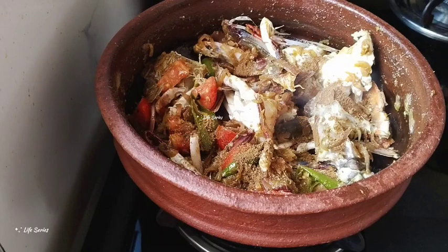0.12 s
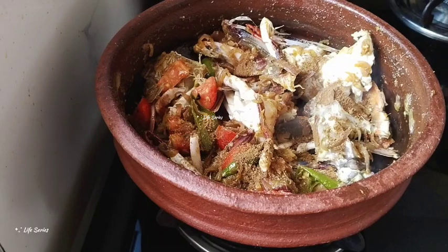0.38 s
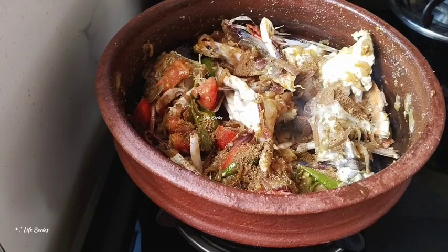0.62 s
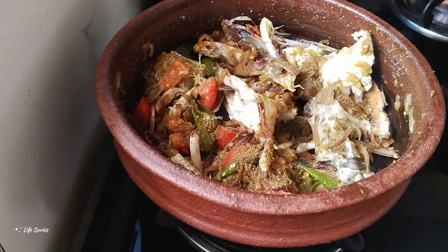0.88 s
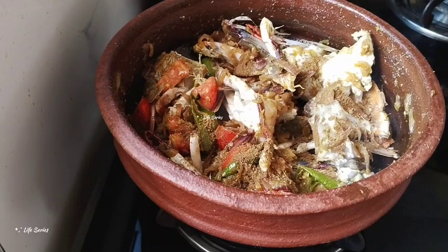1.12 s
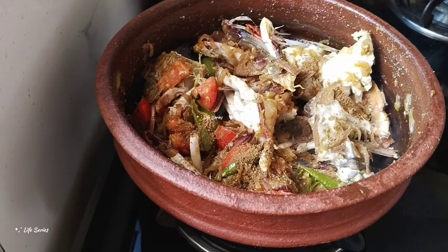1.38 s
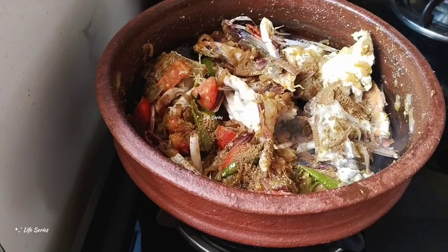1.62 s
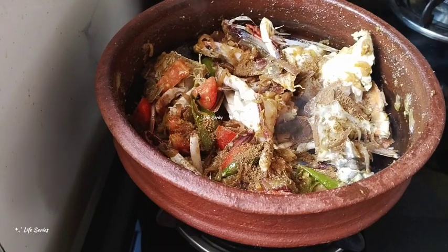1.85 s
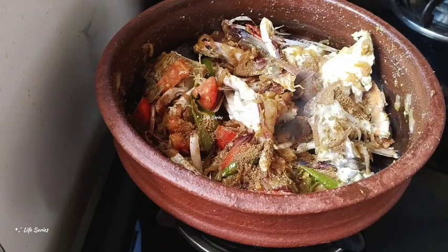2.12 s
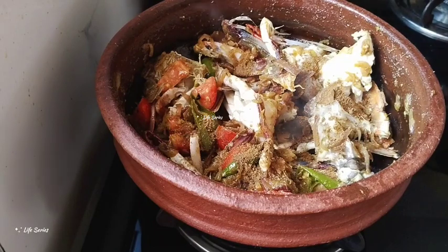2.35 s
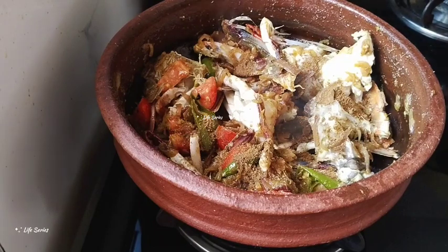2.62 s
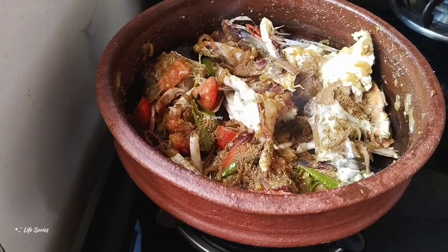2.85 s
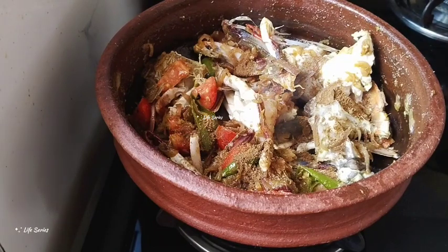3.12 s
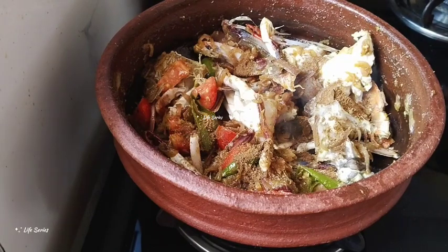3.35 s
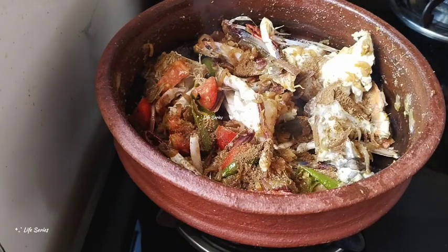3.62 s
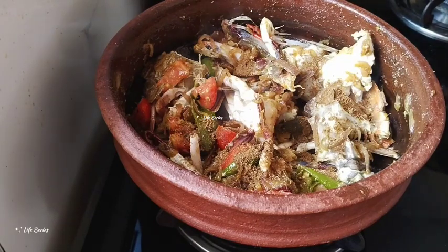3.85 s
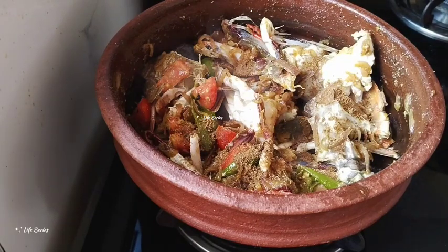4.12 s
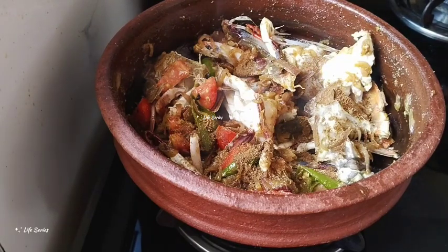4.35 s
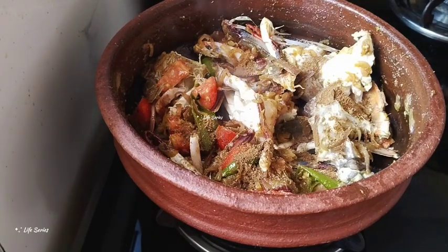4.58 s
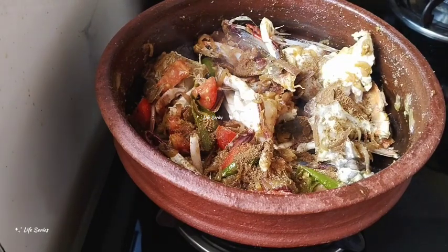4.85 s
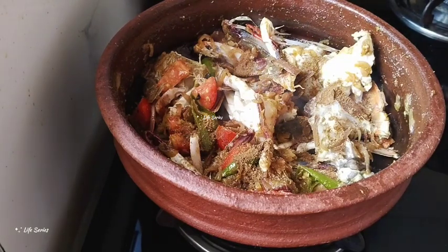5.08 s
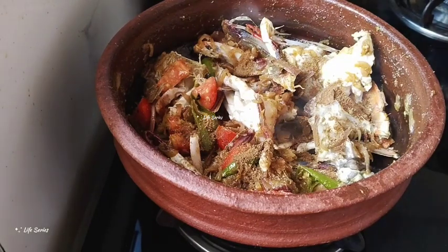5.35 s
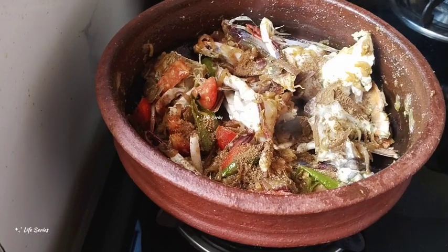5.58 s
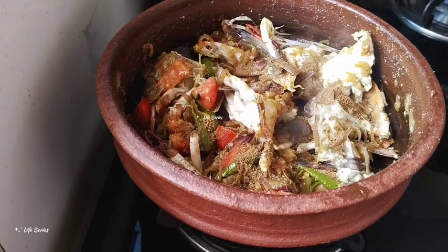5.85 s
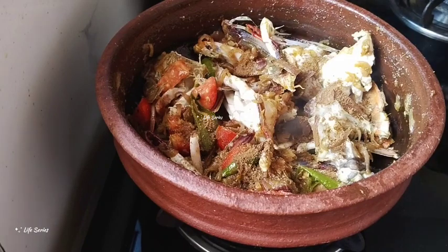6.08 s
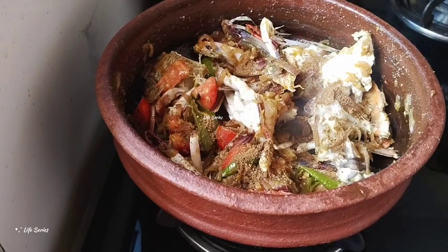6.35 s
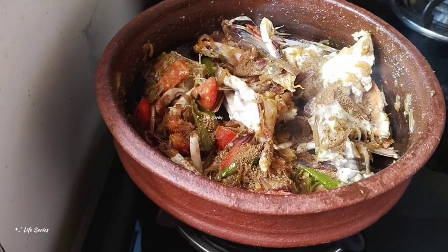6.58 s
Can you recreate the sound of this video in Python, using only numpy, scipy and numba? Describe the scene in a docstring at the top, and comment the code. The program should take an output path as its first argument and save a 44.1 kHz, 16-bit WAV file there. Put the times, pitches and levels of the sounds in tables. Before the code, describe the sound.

A soft, steady sizzle of wet food in a clay pot fills the whole 6.7 seconds, close and wide, its fine fizz flickering and lightly coloured by the pot. Tiny damped crackles are scattered throughout on both sides. Underneath lies a faint low rumble of burner and kitchen, with a brief low hum until 0.6 s. A dull, hollow rustle with soft bumps comes at 0.5-1.1 s. A hissier one starts at 1.6 s and swells near 2.0 s, where the sharpest pops cluster, the loudest at 2.07 s. A weaker rub follows at 2.3-2.65 s, then a longer, brighter rustle until 3.35 s, with clear snaps around 2.9 and 3.05 s. Afterwards it is calmer: even fizz, a snap at 3.9 s, a small soft blip near 4.9 s, and several light high ticks from 5.75 s to the end. Room reflections are short; the sizzle continues without a finish.

```python
"""In a kitchen, onion, tomato and crab sizzle softly in a clay pot, close to two microphone ports.
Thousands of short rings at random pitches form the fizz of steam bubbles, coloured by pot resonances.
Single bubbles burst as short damped crackles; short soft tones of slightly rising pitch, mostly low,
sound now and then; four rustles nearby are noise and grains through moving resonances. Burner and kitchen
give a low rumble of filtered noise and a brief hum; all but fizz and rumble get a tail of reflections."""
import sys
import numpy as np
from scipy import signal
from scipy.fft import rfft, irfft
from scipy.io import wavfile
from scipy.ndimage import uniform_filter1d
from numba import njit

SR = 44100
rng = np.random.default_rng(int(sys.argv[2]) if len(sys.argv) > 2 else 0)


def magnitude_from_level(level_db):
    """Linear magnitude for a level in decibels (20 dB per decade)."""
    exponent = np.asarray(level_db, float) / 20
    return 10 ** exponent


def waveform_to_disk(signal):
    """Save audio, clipped to [-1, 1], as 16-bit WAV at the path in sys.argv[1]."""
    frames = np.transpose(np.atleast_2d(signal))
    scaled = np.clip(frames, -1, 1) * 32767
    samples = np.round(scaled).astype(np.int16)
    wavfile.write(sys.argv[1], SR, samples)


N = 296043
HZ = np.maximum(np.arange(N // 2 + 1) * SR / N, 1)  # frequency bins
S = np.arange(N) / SR  # sample times in s

# heat in the oil, before random flicker: t/s, fizz level from 1.5 to 5.5 kHz/dB,
# treble lift/dB (starts at 4.2 kHz, full from 8.4 kHz)
OIL_HEAT = [(0.0, -59.5, 0.5), (0.5, -57.5, 4.5), (0.57, -60, 0), (0.61, -54, 2.5), (1.15, -60, 0.5),
            (1.19, -55.5, 2), (1.42, -60.5, 6), (1.66, -57, 3.5), (2.4, -56.5, 4), (3.3, -61, -4),
            (3.7, -57.5, 4), (4.0, -57.5, 1.5), (4.4, -59.5, 3), (4.78, -58.5, 0.5), (5.05, -58, 3.5),
            (5.22, -59.5, 0), (5.6, -57, 2.5), (5.8, -59.5, 2.5), (6.0, -59, 3), (6.26, -57.5, 1.5),
            (6.3, -60.5, 6.5), (6.4, -57.5, 1.5), (6.5, -57, 3.5), (6.58, -55, 0), (6.71, -57, 3)]
# loudest bursting bubbles: t/s, nominal peak level/dB, nominal pitch f/Hz, left minus right level/dB
LOUD_BURSTS = [(0.2425, -34, 3360, 0.5), (0.4988, -41, 1500, 4), (0.5978, -37.5, 1500, 0),
               (0.599, -33.5, 3070, -3), (0.864, -27.5, 4850, -1), (1.1653, -30, 12800, 4),
               (1.3761, -36.5, 3100, -3), (1.634, -29, 7240, -1), (1.8597, -34, 6700, 5),
               (1.953, -26, 8600, 0), (1.9595, -25.5, 3380, -1), (1.994, -26, 5080, 6),
               (2.0687, -16.5, 4570, 4.5), (2.0732, -19, 8000, -3), (2.2021, -31, 4400, -4),
               (2.291, -32.5, 7040, 3), (2.851, -30, 5000, 0), (2.9014, -23.5, 2470, 4),
               (3.05, -26.5, 2540, 2), (3.693, -35, 3470, 2), (3.855, -37.5, 2470, -3),
               (3.928, -25, 5130, -0.5), (4.799, -39, 11000, 3), (4.9308, -33.5, 3000, 0),
               (4.974, -35.5, 2220, 0.0), (5.759, -36, 7700, 11), (5.8495, -32.5, 8100, 8),
               (5.96, -42, 3020, -3), (5.983, -33.5, 8000, -4), (6.1425, -37, 5500, -2),
               (6.283, -29.5, 7400, -5), (6.285, -29, 6750, -1), (6.567, -31, 10100, 0),
               (6.66, -31, 10100, -4)]
# correlation of the ports in diffuse noise: f/Hz, share common to both [1]
PORT_LIKENESS = [(60, 0.97), (130, 1), (290, 0.86), (640, 0.65), (1410, 0.41), (3100, 0.2), (6820, 0.066),
                 (15000, 0.085)]


def over_hz(table):
    """Spectral envelope: a (f/Hz, value) table interpolated over log frequency at every bin."""
    f, v = np.transpose(table)
    return np.interp(np.log(HZ), np.log(f), v)


def over_time(rows):
    """Temporal envelope: each column of (t/s, ..) rows interpolated linearly at every sample."""
    s, *columns = np.transpose(rows)
    return [np.interp(S, s, c) for c in columns]


def below(hz, order=4):
    """Butterworth magnitude response of a low-pass."""
    return 1 / np.sqrt(1 + (HZ / hz) ** (2 * order))


def above(hz, order=4):
    """Butterworth magnitude response of a high-pass."""
    return 1 / np.sqrt(1 + (hz / HZ) ** (2 * order))


def peaks_db(modes):
    """Modal resonance: sum of Lorentzian humps in dB from (f/Hz, width/Hz, level/dB) rows."""
    return sum(db / (1 + (2 * (HZ - f) / width) ** 2) for f, width, db in modes)


def shape(x, gain):
    """Linear filtering by a gain per bin; the rms of the mean of the channels becomes 1."""
    y = irfft(rfft(x) * gain, N)
    return y / np.std(y.mean(axis=0))


def pair(two, likeness):
    """Spatial coherence: left and right as sum and difference of a common and an opposed part."""
    c = np.clip(over_hz(likeness), -.99, .99)
    mid, side = rfft(two) * np.sqrt([1 + c, 1 - c])
    return irfft([mid + side, mid - side], N)


def walk(rate):
    """Slow random modulation: levels held 1 / rate s, smoothed by two moving averages; spread 1."""
    k = int(SR / rate)
    held = np.repeat(rng.standard_normal(N // k + 1), k)
    w = uniform_filter1d(uniform_filter1d(held, k), k)[:N]
    return w / np.std(w)


@njit
def ring(start, hz, fade, size, rise):
    """Damped oscillation: each tone swells, then decays exponentially, with its own phase per strand."""
    out = np.zeros((2, N))
    for k in range(len(start)):
        turn = fade[k] * np.exp(2j * np.pi * hz[k] / SR)
        a, b, swell = size[0, k], size[1, k], 0.
        for i in range(start[k], min(N, start[k] + int(4 / (1 - fade[k])))):
            a, b = a * turn, b * turn
            swell = swell + (1 - swell) * rise
            out[0, i] += swell * a.imag
            out[1, i] += swell * b.imag
    return out


def grains(count, spread_db, ring_ms, hiss_db, shake_db):
    """Granular texture: two strands of short rings of uneven size and length over a fluttering hiss."""
    c = rng.random((count, 6)).T
    start = (c[0] * N).astype(np.int64)
    hz = 16500 * c[1]
    size = magnitude_from_level(spread_db * c[2] ** 2) * np.exp(2j * np.pi * c[4:])
    # decay times lie within half an octave of ring_ms
    fade = np.exp(-1000 / (ring_ms * SR * 2 ** (c[3] - .5)))
    tones = ring(start, hz, fade, size, 2000 / (ring_ms * SR))
    hiss = magnitude_from_level(hiss_db + shake_db * walk(300)) * rng.standard_normal((2, N))
    return tones / np.std(tones) + hiss


@njit
def svf(x, hz, q):
    """State-variable band-pass: two integrators whose centre frequency moves with every sample."""
    y, band, low = np.empty(len(x)), 0., 0.
    for i in range(len(x)):
        g = np.tan(np.pi * hz[i] / SR)
        v = (band + g * (x[i] - low)) / (1 + g * (g + 1 / q))
        band, low, y[i] = 2 * v - band, low + 2 * g * v, v / q
    return y


def formant(x, hz, q, lift):
    """Moving formant: a resonance passed twice lifts a band; the running rms stays near 1."""
    y = x + lift * np.array([svf(svf(ch, hz, q), hz, q) for ch in x])
    return y / np.sqrt(uniform_filter1d(y.mean(axis=0) ** 2, SR // 6))


def rumble():
    """Low-passed noise of flame and kitchen: half octaves that waver alone; a brief hum."""
    # spectrum of the noise: f/Hz, level/dB per Hz
    spectrum = [(15, -57), (25, -22), (48, -19), (87, -0.5), (107, -1), (188, -2), (211, -1), (246, -2.5),
                (332, -5), (373, -5), (400, -14), (520, -40), (880, -120)]
    # low resonances of the kitchen: f/Hz, width/Hz, level/dB
    modes = [(110.4, 14.6, 8.5), (123.4, 17, 3.5), (155.8, 9.8, 9.5), (187, 29, 6), (242.4, 8.4, 3)]
    # nominal course of the noise: t/s, level/dB
    course = [(0.0, -61.5), (0.17, -64.5), (0.42, -62.5), (0.8, -62.5), (1.0, -66), (1.5, -67),
              (2.1, -67.5), (2.43, -67.5), (2.65, -62), (2.9, -73), (3.3, -63), (3.6, -66), (4.0, -69),
              (4.5, -67.5), (5.05, -68.5), (5.55, -69), (6.2, -67), (6.71, -68)]
    # hum: nominal f/Hz, nominal peak level/dB, start t/s, end t/s, fade/s
    hum_row = (130.5, -59, 0, 0.6, 0.03)
    gain = magnitude_from_level(over_hz(spectrum) + peaks_db(modes)) * below(320)
    noise = shape(pair(rng.standard_normal((2, N)), PORT_LIKENESS), gain)
    out = 0
    for centre in 22 * 2 ** np.arange(0, 5, .5):
        slot = np.cos(np.pi * np.clip(np.log2(HZ / centre), -.5, .5)) ** 2
        out = out + irfft(rfft(noise) * slot, N) * magnitude_from_level(2.8 * walk(11))
    hz, db, starts, ends, fade = hum_row
    phase = 2 * np.pi * np.cumsum(hz * (1 + 0.0092 * walk(8.1))) / SR
    hum = np.sin(phase) * np.clip(np.minimum(S - starts, ends - S) / fade, 0, 1)
    return out * magnitude_from_level(over_time(course)[0] + 1.8 * walk(7)) + hum * magnitude_from_level(db + 1.5 * walk(11.5))


def kitchen(dry):
    """Room reverberation: direct sound plus exponentially decaying noise, different at each port."""
    t60_s, tail_db = .18, -4.5
    t = np.arange(SR // 4) / SR
    tail = rng.standard_normal((2, len(t))) * magnitude_from_level(-60 * t / t60_s) * (1 - np.exp(-t / 0.0014))
    # long waves reach both ports alike
    tail[1] = tail[0] + signal.lfilter(*signal.butter(2, 700, "high", fs=SR), tail[1] - tail[0])
    tail = tail / np.sqrt(np.sum(tail ** 2, axis=1, keepdims=True))
    return dry + magnitude_from_level(tail_db) * signal.fftconvolve(dry, tail, axes=1)[:, :N]


def rustle():
    """Friction noise: rubbing excites a dull hollow body and a grainy hiss, with shifting resonances."""
    # four rustles, how hard each rubs: t/s, dull body level/dB, body centre f/Hz, hiss level/dB
    strokes = [
        [(0.5, -70, 436, -99), (0.56, -66, 410, -86), (0.65, -57, 520, -66), (0.708, -52, 560, -57),
         (0.735, -47.5, 557, -59.5), (0.78, -52, 574, -61), (0.85, -55.5, 490, -68), (0.866, -44, 587, -70),
         (0.91, -55, 820, -77), (0.97, -61, 840, -79), (1.03, -60, 500, -86), (1.15, -74, 506, -75)],
        [(1.615, -84, 350, -68), (1.632, -52, 330, -49.5), (1.72, -74, 504, -80), (1.908, -76, 810, -60),
         (1.945, -53.5, 840, -50.5), (1.97, -41.5, 834, -45.5), (1.99, -47.5, 820, -47), (2.014, -44, 474, -45),
         (2.038, -50, 700, -53), (2.065, -48, 840, -46.5), (2.1, -55, 790, -49), (2.17, -56, 574, -55.5),
         (2.248, -66.5, 487, -67), (2.3, -91, 500, -83)],
        [(2.3, -76, 530, -79), (2.432, -49.5, 412, -57), (2.536, -63, 563, -72), (2.6, -58.5, 516, -64),
         (2.66, -63, 510, -56)],
        [(2.66, -64, 520, -61), (2.705, -58, 535, -50.5), (2.75, -49.5, 493, -43.5), (2.845, -57.5, 640, -43.5),
         (2.87, -43, 435, -40.5), (2.93, -50, 690, -41.5), (3.02, -50, 670, -48), (3.06, -50.5, 627, -46.5),
         (3.116, -52, 576, -46.5), (3.155, -47.5, 670, -50), (3.23, -58.5, 796, -55.5), (3.29, -65.5, 815, -63),
         (3.36, -84, 820, -57)],
    ]
    # colour of each rustle: treble relative to the middle/dB, nominal treble centre f/Hz,
    # linear lift of the treble resonance [1], bass relative to the body/dB
    tones = [(11, 6400, 7.9, -11.5), (-6.5, 8600, 8.7, -34), (-12, 8800, 15, -7), (-7, 8600, 4.7, -8)]
    # spectrum of the hiss: f/Hz, level/dB per Hz
    air_spectrum = [(590, -8), (1000, -2), (1950, -4.5), (2380, -2), (2830, -3), (6490, -5), (8670, -4.5),
                    (12500, 8), (15800, -4)]
    # resonances of the rubbed body: f/Hz, width/Hz, level/dB
    hollow = [(317, 30, 7.5), (423, 48, 2.5), (660, 32, 2), (754, 47, 5.5), (840, 39, 2), (950, 61, 6)]
    # correlation of the ports: f/Hz, correlation [1]
    likeness = [(60, 0.55), (130, 1), (290, 0.93), (640, 0.21), (1410, 0.017), (3100, -0.41),
                (6820, -0.073), (15000, -0.01)]
    body_db, body_hz, hiss_db = over_time(np.vstack(strokes))
    which = np.searchsorted([r[0][0] for r in strokes[1:]], S)
    treble_db, top_hz, focus, bass_db = np.array(tones)[which].T
    # 35 ms fades just outside each rustle
    on = sum(np.clip(np.minimum(S - r[0][0], r[-1][0] - S) / 0.035 + 1, 0, 1) for r in strokes).clip(0, 1)
    rub = pair(grains(count=9000, spread_db=12, ring_ms=5, hiss_db=5, shake_db=2.5), likeness)
    air = magnitude_from_level(over_hz(air_spectrum))
    body = shape(rub, magnitude_from_level(peaks_db(hollow)) * above(294) * below(1110, order=8))
    bass = shape(rub, above(149) * below(307))
    body = formant(body, body_hz, 1.25, 2.7) + magnitude_from_level(bass_db) * bass
    mid = shape(rub, air * above(1410) * below(6300))
    drift_octaves = .03 * walk(8)
    top = formant(shape(rub, air * above(4900)), top_hz * 2 ** drift_octaves, 1.8, focus)
    return on * (body * magnitude_from_level(body_db) + (mid + top * magnitude_from_level(treble_db)) * magnitude_from_level(hiss_db))


def soft_tones():
    """Frequency-swept Gaussian pulses: short soft tones of slightly rising pitch, alike at both ports."""
    # mostly low tones, some within the first rustle:
    # centre t/s, rms level at the centre/dB, pitch at the centre f/Hz, length/s
    pulses = [(0.1, -58.5, 840, 0.049), (0.725, -52, 340, 0.055), (0.728, -50, 570, 0.03),
              (0.864, -50, 423, 0.012), (3.456, -64, 99, 0.044), (3.46, -64, 246, 0.058),
              (4.222, -65, 377, 0.049), (4.861, -52, 2490, 0.025), (4.966, -65, 245, 0.11),
              (5.06, -61, 172, 0.03), (6.426, -63, 719, 0.043)]
    rise = 0.11  # share of the pitch gained per length
    out = 0
    for s, db, hz, length in pulses:
        u = np.clip((S - s) / length, -2, 2)
        tone = np.sin(2 * np.pi * hz * length * u * (1 + rise * u / 2))
        out = out + magnitude_from_level(db) * np.exp(-4 * u ** 2) * tone
    return out * np.sqrt(2)


def faint():
    """Random point process: small bursts at any moment, pitch and side; hotter oil bursts harder."""
    count = int(400 * N / SR)  # 400 bursts per s
    level_db, spread_db, centre_hz, pan_db = -53, 3.5, 3800, 3
    c = rng.standard_normal((count, 3)).clip(-2, 2).T
    s = rng.random(count) * N / SR
    heat_db = over_time(OIL_HEAT)[0]
    hz = np.clip(centre_hz * 2 ** (0.63 * c[1]), 2000, 12000)
    db = level_db + spread_db * c[0] + heat_db[(s * SR).astype(int)] - heat_db.mean()
    return np.transpose([s, db, hz, pan_db * c[2]])


def crackles():
    """Impulsive bubble bursts: a sharp start, a few damped cycles and a dull tick; droplets follow."""
    # two droplets per burst: level below it, largest delay step, mean pitch step up or down
    droplet_db, droplet_s, droplet_octaves = -7.5, 0.001207, 0.41
    rows = np.vstack([LOUD_BURSTS, faint()])
    c = rng.random((len(rows), 10)).T[:, :, None]
    s, db, pitch, pan_db = rows.T[:, :, None]
    at = (s * SR).astype(int) + np.arange(256)
    out = np.zeros((2, N + 512))
    for k in range(3):  # the burst itself, then its droplets
        octaves = droplet_octaves * [0, 1, -1][k] * (.5 + c[4 + k])
        hz = np.clip(pitch * 2 ** octaves, 900, 14500)
        u = (np.arange(256) / SR - .0008 - droplet_s * k * c[7 + k]) * hz  # time in cycles
        tick = 0.14 * np.gradient(np.exp(-(u / 0.96) ** 2), axis=1) * SR / hz
        attack = np.exp(-(u / 0.48) ** 2)
        decay = np.exp(-np.abs(u) / (1.42 * np.sqrt(hz / 4000)))  # high bursts ring more cycles
        swell = np.where(u < 0, attack, decay)
        for ch in range(2):
            # the two ports hear slightly different pitch and phase
            cycles = u * (.95 + .1 * c[ch]) + c[2] + .12 * ch * c[3]
            burst = swell * np.cos(2 * np.pi * cycles)
            pop = magnitude_from_level(db + droplet_db * (k > 0) + (.5 - ch) * pan_db) * (burst + tick)
            out[ch] += np.bincount(at.ravel(), pop.ravel(), N + 512)
    return irfft(rfft(out[:, :N]) * above(860), N)


def flare_db(hz):
    """Excitation and relaxation: loud bursts stir up fizz near their pitch; single bands swell in passing."""
    # passing swells of the fizz in one band: centre t/s, gain/dB, pitch f/Hz, Gaussian half length/s
    band_swells = [(4.552, 8.5, 4580, 0.12), (4.677, 8, 1510, 0.052), (5.053, 4, 840, 0.22),
                   (5.598, 6, 4500, 0.08), (6.098, 9, 820, .12), (6.15, 1.5, 4400, .08),
                   (2.604, 7.5, 3400, 0.13)]
    jump_db, decay_s, width_octaves = 4.5, 0.044, 0.28

    def near(pitch):
        return np.exp(-(np.log2(pitch / hz) / width_octaves) ** 2)

    s, _, pitch, _ = np.transpose(LOUD_BURSTS)
    kick = np.zeros(N)
    kick[(s * SR).astype(int)] = jump_db * near(pitch)
    swells = sum(db * near(f) * np.exp(-((S - at) / half) ** 2)
                 for at, db, f, half in band_swells if near(f) > .01)
    return swells + signal.lfilter([1], [1, -np.exp(-1 / (decay_s * SR))], kick)


def sizzle():
    """Source-filter fizz: dense bubble rings coloured by the pot; neighbouring bands flicker alone."""
    # spectrum of the fizz: f/Hz, level/dB per Hz
    spectrum = [(150, -29), (250, -29), (303, -10), (379, -8.5), (467, -7.5), (786, -7.5), (1060, -7.5),
                (1970, 0.5), (2340, -2.5), (4530, 0.5), (5300, -2), (6750, -1.5), (10500, -3), (12500, -7),
                (15800, -15.5)]
    # resonances of the pot: f/Hz, width/Hz, level/dB
    pot_modes = [(822, 250, 7), (1430, 197, 7), (1920, 140, 1.5), (2390, 1600, -1), (2800, 690, 6),
                 (3360, 174, 4.5), (4026, 234, 6), (4650, 300, 4.5), (6200, 760, -0.5), (8200, 260, 3),
                 (10100, 2500, -1)]
    level_db, bright_db = over_time(OIL_HEAT)
    strands = grains(count=14000, spread_db=12.5, ring_ms=11.3, hiss_db=2.0, shake_db=1.5)
    fizz = pair(strands, PORT_LIKENESS)
    gain = magnitude_from_level(over_hz(spectrum) + peaks_db(pot_modes))
    middle = irfft(rfft(fizz.mean(axis=0)) * gain * above(1500) * below(5500), N)
    level_db = level_db + 0.9 * walk(14)
    bright_db = bright_db + 1.07 * walk(12)
    out = 0
    for hz in 250 * 2 ** np.arange(0, 6.3, .5):
        slot = np.cos(np.pi * np.clip(np.log2(HZ / hz), -.5, .5))
        lift_db = bright_db * np.clip(np.log2(hz / 4200), 0, 1)
        flicker_db = 1.6 * walk(9) + 1.02 * walk(30)
        out = out + irfft(rfft(fizz) * gain * slot, N) * magnitude_from_level(lift_db + flare_db(hz) + flicker_db)
    return out / np.std(middle) * magnitude_from_level(level_db)


def scene():
    """Superposition of all sources; crackles, rustles and soft tones excite the room."""
    return rumble() + kitchen(rustle() + soft_tones() + crackles()) + sizzle()


def roll_off(x):
    """The treble ends steeply here."""
    return signal.sosfilt(signal.butter(12, 16440, fs=SR, output="sos"), x)


def record(dry):
    """Transducer response: the ports differ in level over frequency, and the top is cut at 15.75 kHz."""
    # difference of the ports: f/Hz, left minus right level/dB
    port_tilt = [(60, -1), (110, -0.5), (200, 0), (380, -1), (700, 1.5), (1290, -0.5), (2380, 0.5),
                 (4400, 0), (8120, 2), (11500, -1), (15000, 12)]
    tilt = over_hz(port_tilt) / 2
    gain = magnitude_from_level(np.array([tilt, -tilt])) * below(15750, order=200)
    mix = irfft(rfft(dry) * gain, N)
    return roll_off(mix)


dry = scene()
out = record(dry)
waveform_to_disk(out)
```